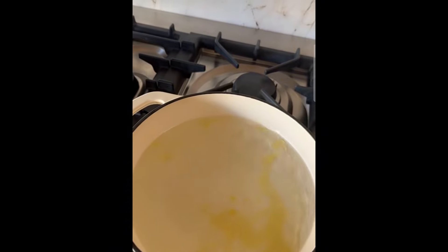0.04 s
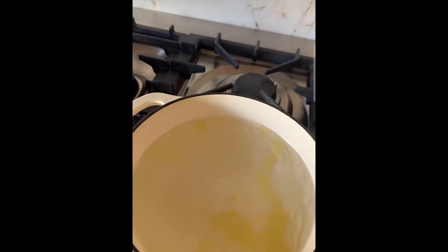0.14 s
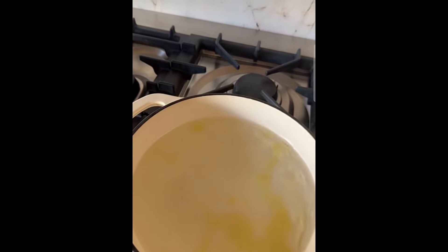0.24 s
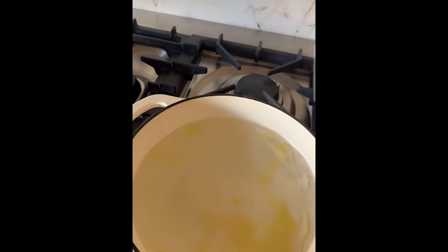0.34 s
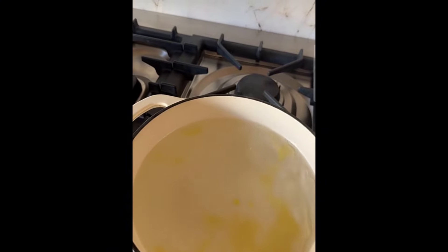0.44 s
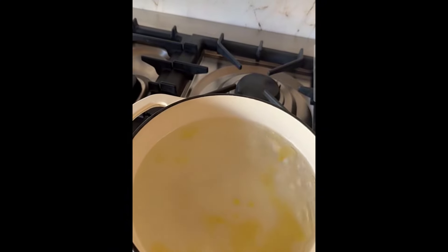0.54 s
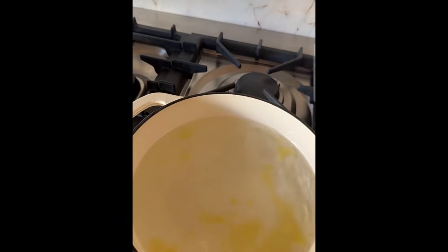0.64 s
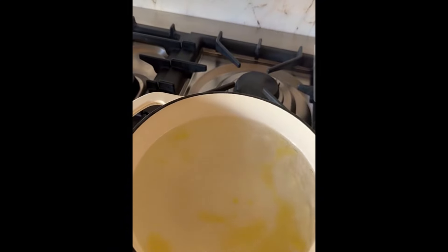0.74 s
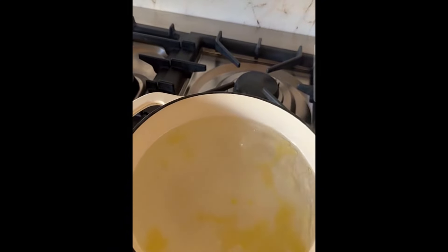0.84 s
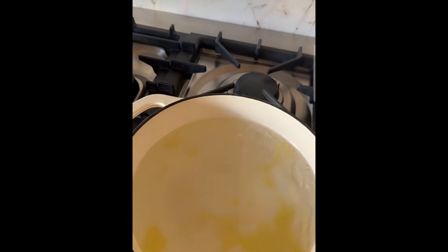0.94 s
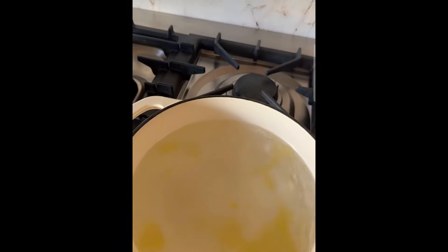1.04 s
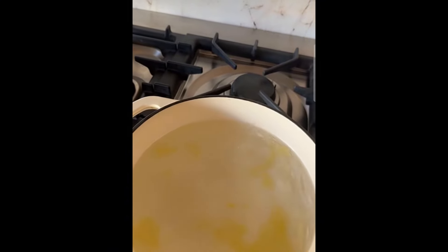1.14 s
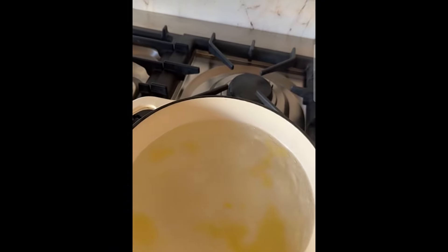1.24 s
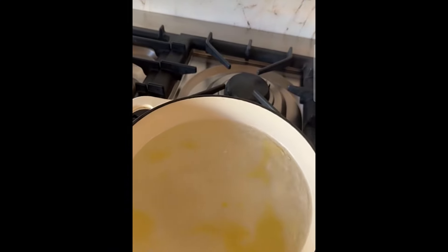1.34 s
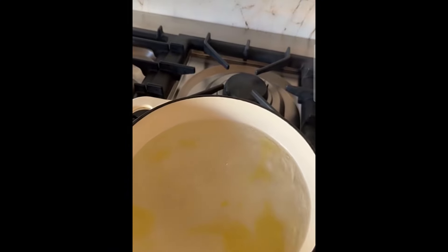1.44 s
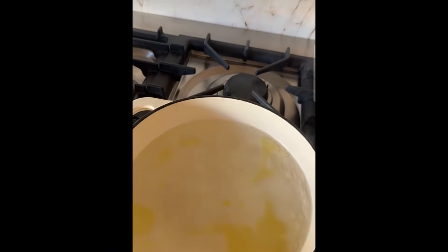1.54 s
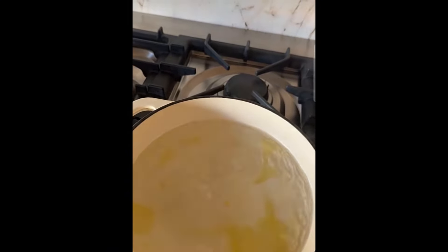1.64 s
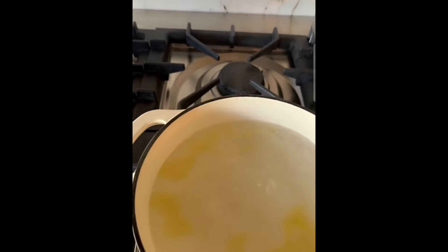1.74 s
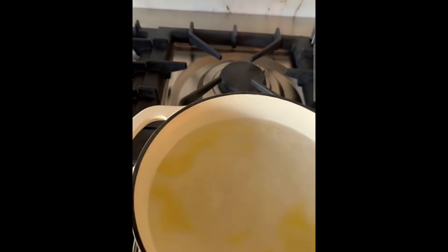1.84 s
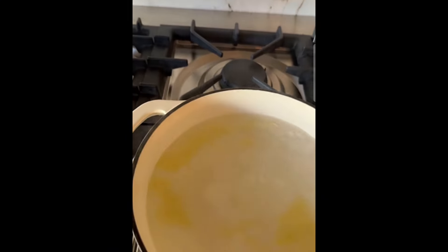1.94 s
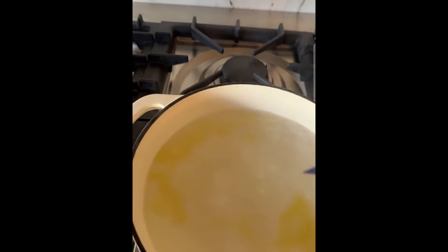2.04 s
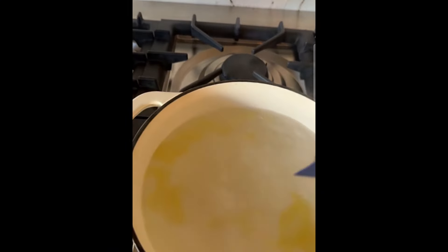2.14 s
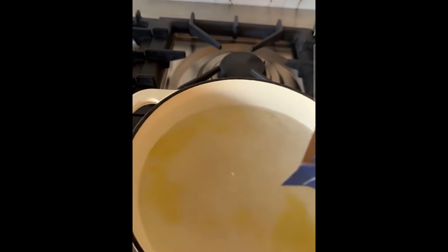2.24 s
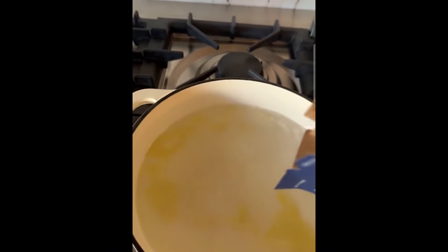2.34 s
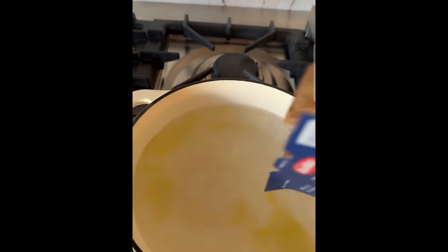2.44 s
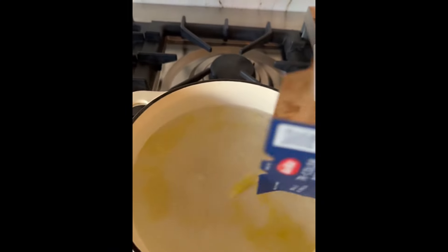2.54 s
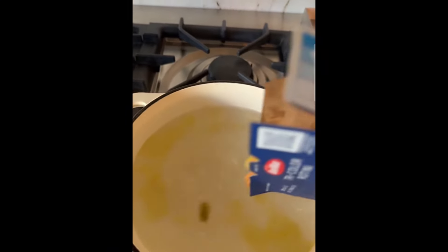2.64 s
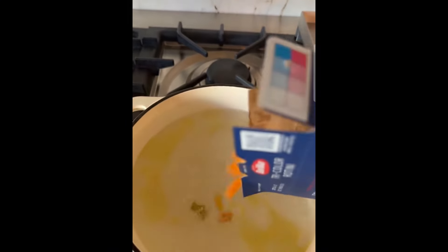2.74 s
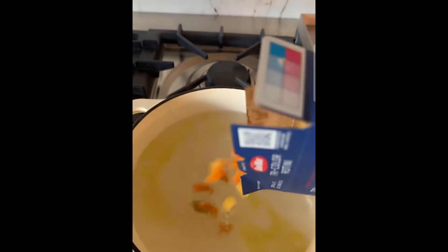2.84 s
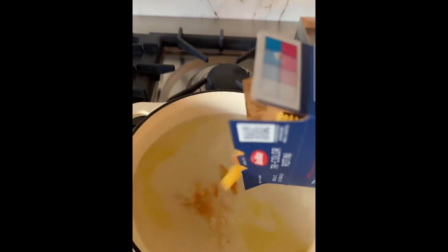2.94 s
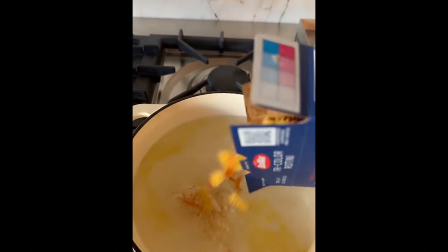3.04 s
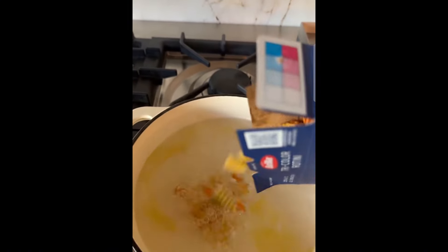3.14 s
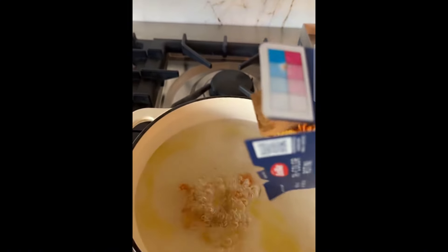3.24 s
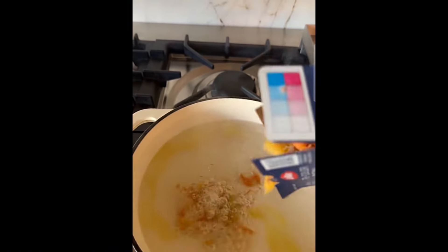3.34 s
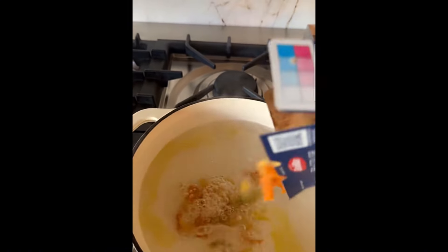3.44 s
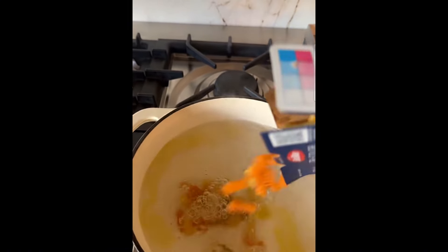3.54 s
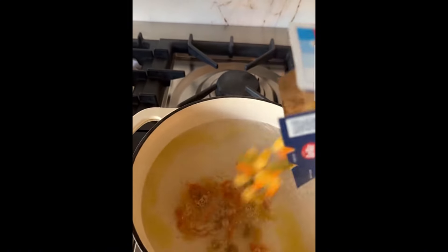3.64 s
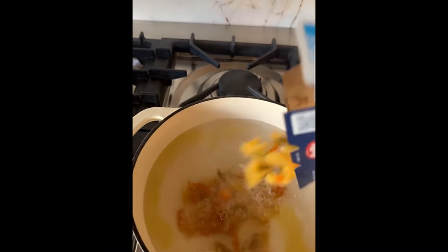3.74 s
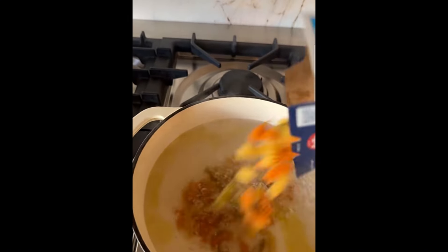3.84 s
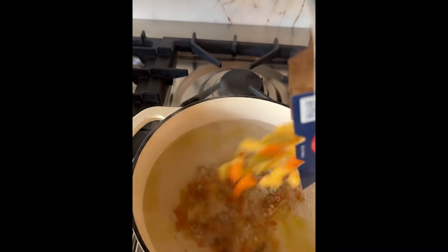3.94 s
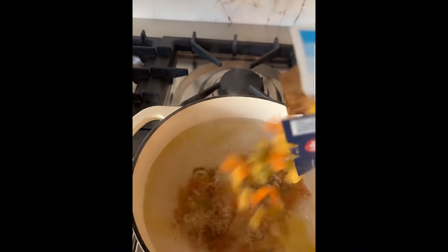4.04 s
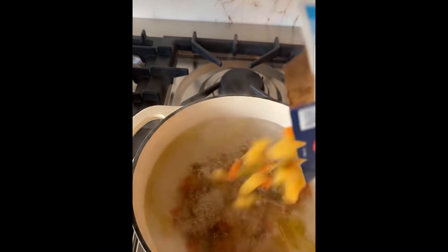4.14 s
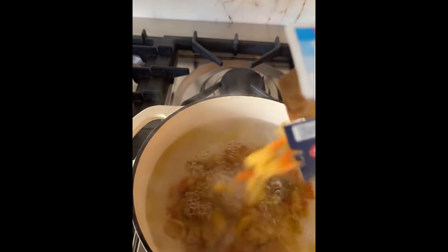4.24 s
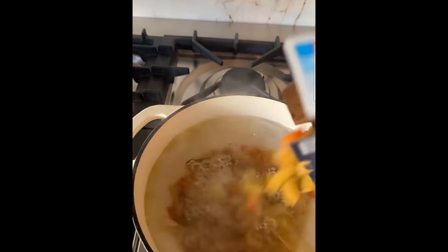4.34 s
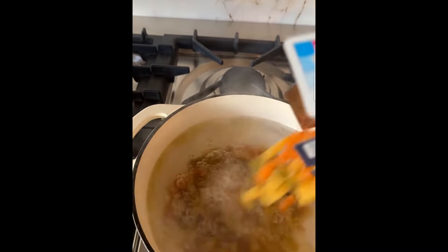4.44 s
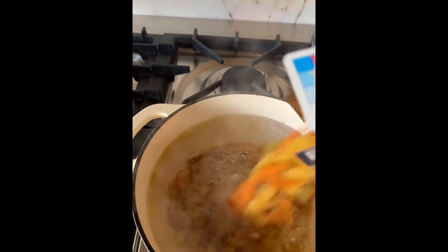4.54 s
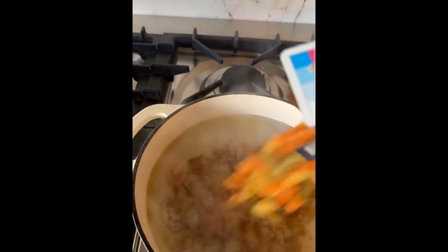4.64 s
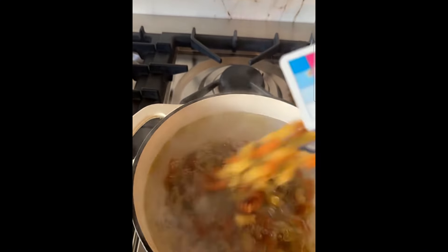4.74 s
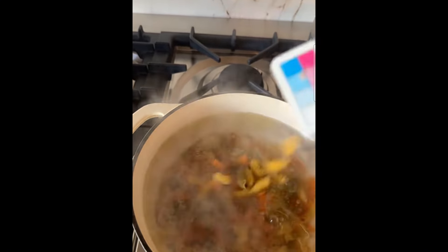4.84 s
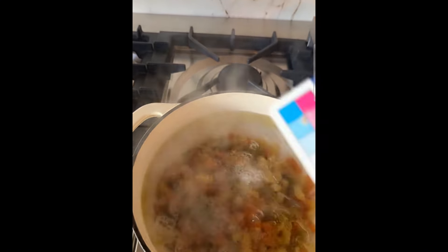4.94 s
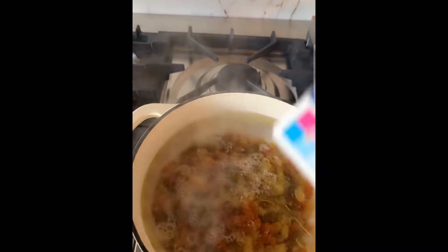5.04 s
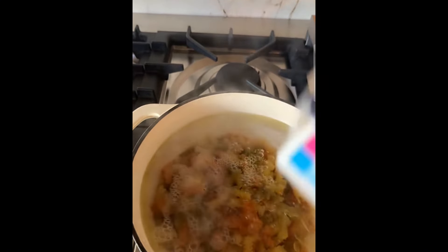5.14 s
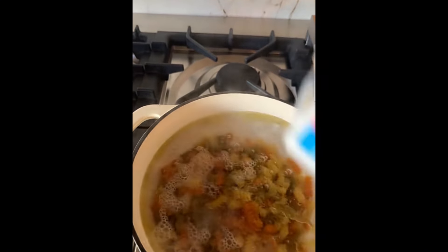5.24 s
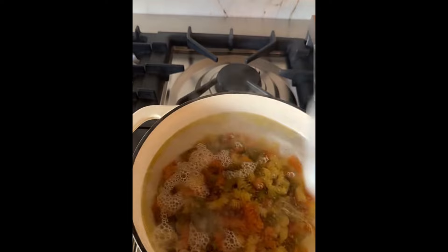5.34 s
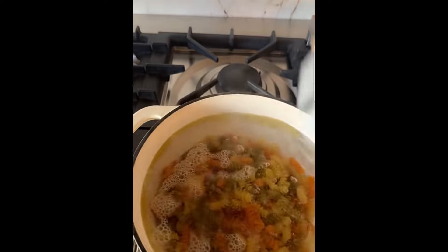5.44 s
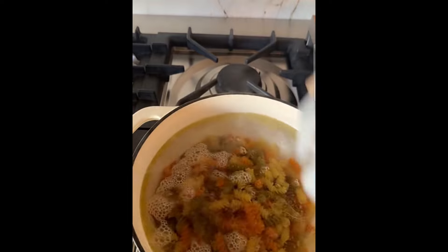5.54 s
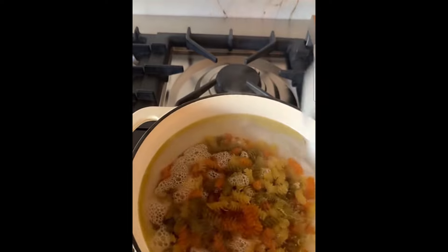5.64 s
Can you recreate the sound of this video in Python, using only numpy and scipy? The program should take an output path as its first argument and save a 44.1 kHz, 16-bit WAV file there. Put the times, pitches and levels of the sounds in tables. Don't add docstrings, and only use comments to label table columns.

```python
import sys
import numpy as np
from scipy import signal
from scipy.io import wavfile

SR = 44100
rng = np.random.default_rng(int(sys.argv[2]) if len(sys.argv) > 2 else 0)


def invert_db(x):
    u = np.asarray(x, float) / 20
    return 10 ** u


def digitize_waveform(pressure):
    field = np.atleast_2d(pressure).T
    bounded = np.clip(field, -1, 1)
    quanta = np.round(bounded * 32767).astype(np.int16)
    wavfile.write(sys.argv[1], SR, quanta)


N = 250929

# (time [s], flow [dB], openness [dB])
FIRST_FLOW = [
    (2.1, -44, -2),
    (2.33, -33.5, -0.5),
    (2.38, -32, -1),
    (2.53, -30.5, -1),
    (2.62, -25, -1.5),
    (2.93, -29, -1.5),
    (3.04, -33.5, 0),
    (3.14, -42, 0.5),
    (3.21, -35, -0.5),
]
SECOND_FLOW = [
    (3.29, -34, 0),
    (3.499, -23.5, -0.5),
    (3.74, -23, 1),
    (4.099, -24.5, 1.5),
    (4.449, -21.5, 3.5),
    (4.68, -24.5, 7),
    (4.801, -37.5, 13),
    (4.85, -47.5, 0),
    (4.93, -58.5, 8.5),
]


def in_time(rows):
    s, *columns = np.transpose(rows)
    return [np.interp(np.arange(N) / SR, s, column) for column in columns]


def at_hz(points, hz):
    points_hz, points_db = np.transpose(points)
    return np.interp(np.log(hz), np.log(points_hz), points_db)


def rms_one(x):
    return x / np.sqrt(np.mean(x ** 2) + 1e-20)


def drift(rate):
    r = np.exp(-80 * np.pi * rate / SR)
    noise = rng.standard_normal(N // 40 + 2002)
    slow = signal.lfilter([1], [1, -2 * r, r * r], noise)[2000:]
    return np.interp(np.arange(N) / 40, np.arange(len(slow)), rms_one(slow))


def resonance(x, hz, width_hz):
    r = np.exp(-np.pi * width_hz / SR)
    poles = [1, -2 * r * np.cos(2 * np.pi * hz / SR), r * r]
    return signal.lfilter([(1 - r * r) / 2, 0, (r * r - 1) / 2], poles, x + 1e-18)


def ring(clicks, hz, t60):
    r = invert_db(-60 / (t60 * SR))
    w = 2 * np.pi * hz / SR
    return signal.lfilter([0, np.sin(w)], [1, -2 * r * np.cos(w), r * r], clicks + 1e-18)


def band_pass(x, low_hz, high_hz):
    return signal.sosfilt(signal.butter(2, [low_hz, high_hz], "band", fs=SR, output="sos"), x)


def bands(length, count=3):
    edges = 25 * 2 ** np.arange(0, 9.5, 1 / count)
    white = rng.standard_normal((2, length))
    for k, (low, high) in enumerate(zip(edges, edges[1:])):
        yield np.sqrt(low * high), band_pass(white[k % 2], low, high)


def add(out, s, sound):
    i = round(s * SR)
    out[i:i + len(sound)] += sound[:N - i]


def blip(hz, cycles, length=900):
    turn = np.arange(length) / SR * hz
    return np.sin(2 * np.pi * turn) * np.e * turn / cycles * np.exp(-turn / cycles)


def puff(low_hz, high_hz, decay_s):
    t = np.arange(3000) / SR
    noise = band_pass(rng.standard_normal(len(t)), low_hz, min(high_hz, 16000))
    return 0.42 * rms_one(noise) * np.exp(-t / decay_s) * (1 - np.exp(-t / 0.00058))


def pour():
    # (time [s], surge [dB])
    shakes = [(2.585, 1), (2.699, 1), (2.852, 5), (3.379, -1), (3.55, 1.5), (3.7, -0.5), (3.853, 0.5),
              (4.017, 2.5), (4.19, 4.5), (4.351, 4.5), (4.498, 2.5), (4.689, 1)]
    surge_rise_s = 0.03
    flow_db, open_db = in_time(FIRST_FLOW + SECOND_FLOW)
    t = np.arange(N) / SR
    for s, db in shakes:
        since = np.clip((t - s) / surge_rise_s, 0, None)
        flow_db = flow_db + db * since * np.exp(1 - since)
    return flow_db, open_db


def stream():
    # (frequency [Hz], level [dB per Hz])
    full_colour = [(65, -31), (110, -17.5), (163, -9.5), (274, -7), (424, -7.5), (656, -11.5), (859, -3),
                   (1740, -12), (2480, -5.5), (3310, -16.5), (4250, -18.5), (5120, -33), (11300, -44),
                   (15700, -44)]
    # (frequency [Hz], level [dB per Hz])
    empty_colour = [(65, -8), (110, -16.5), (205, -20.5), (433, -14), (501, -12), (712, 3.5), (1040, -12.5),
                    (1170, -1.5), (1630, -12), (2420, 2.5), (3110, -5), (5560, -22), (11300, -29),
                    (15700, -26.5)]
    # (time [s], time [s])
    emptying_s = (3.02, 5.4)
    # (frequency [Hz], width [log pitch], full box [dB], empty box [dB])
    hollows = [(2450, 0.23, -1.5, -1.5), (4500, 0.12, 0, 9.5)]
    part_edges_hz = [50, 450, 1600, 5500, 15900]
    # (level over the flow [dB], share of the flow's swing [1], share of the openness [1])
    part_laws = [
        (-11, 0.83, -0.83),
        (-1.5, 1.03, -0.4),
        (-2.5, 1.023, 0.44),
        (-15.0, .9, 1.3),
    ]
    mean_flow_db, splash_patchy_db = -30, 1.23
    contacts_per_s, crowding = 2500, 0.8
    together = 0.76

    flow_db, open_db = pour()
    swing_db = flow_db - mean_flow_db
    part_db = [mean_flow_db + db + swing * swing_db + opens * open_db for db, swing, opens in part_laws]

    mean_per_s = np.clip(contacts_per_s * invert_db(crowding * (part_db[3] + 38)), 400, 20000)
    sizes = invert_db(3 * np.minimum(rng.exponential(1, N), 4.6)) * rng.choice([-1, 1], N)
    clumped = mean_per_s * invert_db(1.6 * drift(14.0))
    contacts = sizes * (rng.random(N) < clumped / SR) / np.sqrt(mean_per_s)

    fade = np.exp(-1 / (0.0043 * SR))
    spray = np.sqrt(signal.lfilter([1 - fade], [1, -fade], contacts ** 2))
    spray = spray * invert_db(splash_patchy_db * drift(16.0))

    share = rng.standard_normal(N)
    parts, power = np.zeros((4, N)), np.zeros((4, N))
    t = np.arange(N) / SR
    emptied = np.interp(t, emptying_s, [0, 1])
    for k, hz in enumerate(np.geomspace(60, 15500, num=55)):
        part = np.searchsorted(part_edges_hz, hz) - 1
        own_share = np.roll(share, 997 * k)
        if part == 3:
            width_hz, push = 0.15 * hz, spray * own_share
        else:
            width_hz, push = 0.11 * hz, contacts * (own_share + together * (-1) ** k)
        struck = resonance(resonance(push, hz, width_hz), hz, width_hz)
        lift = sum(np.exp(-(np.log(hz / top_hz) / wide) ** 2) * np.array(dbs) for top_hz, wide, *dbs in hollows)
        full_db = at_hz(full_colour, hz) + lift[0]
        empty_db = at_hz(empty_colour, hz) + lift[1]
        gain = invert_db((1 - emptied) * full_db + emptied * empty_db)
        parts[part] += gain * struck
        power[part] += gain ** 2 * np.mean(struck ** 2)

    end_s = SECOND_FLOW[-1][0]
    flowing = np.interp(t, [1.8, 1.9, end_s, end_s + 0.18], [0, 1, 1, 0])
    return flowing * sum(invert_db(db - 2.0) * part for db, part in zip(part_db, parts / np.sqrt(power)))


def clacks():
    # (time [s], peak [dB], pitch [Hz], box wall [dB])
    single_pieces = [(2.1036, -33, 2290, -20), (2.173, -30, 2500, -8), (2.2114, -19.5, 2340, -30),
                     (2.2608, -17, 2350, -10), (2.2937, -20, 2430, -16), (2.317, -12, 2450, -21),
                     (2.3461, -3, 2590, -15), (2.358, -9.5, 2470, -4), (2.3714, -16, 2340, -8),
                     (2.4032, -8.5, 2400, -24), (2.4166, -8.5, 2510, -9), (2.4537, -18, 2540, -10),
                     (2.4694, -16.5, 2860, -14), (2.5096, -9, 2450, -11), (2.566, -7, 2520, -11),
                     (2.589, -2.5, 2440, -27), (2.592, -2, 2400, -24), (2.6144, -15, 2380, -17),
                     (2.625, -3.5, 2660, -21), (2.6926, -9, 2440, -15), (2.712, -5, 2480, -19),
                     (2.7464, -10, 2450, -21), (2.7829, -15, 2500, -8), (2.848, -9, 2350, 0),
                     (2.9185, -15.5, 2540, 1), (2.9751, -33, 2600, 2), (3.0121, -18, 2290, 8),
                     (3.0313, -22.5, 2700, 8.5), (3.053, -21, 2450, -14), (3.2545, -31, 2870, -4),
                     (3.4324, -33, 2380, 2), (3.511, -14, 2450, -2), (3.5528, -6, 2384, -10),
                     (3.5894, -21, 2500, 9), (3.6656, -8, 2670, 2), (3.7104, -3.5, 2350, 3),
                     (3.8474, -6, 2200, -2.5), (3.894, -7.5, 2320, 1), (3.9414, -28, 2370, 16),
                     (3.9964, -7, 2440, -22), (4.0114, -7, 2850, 0), (4.0422, -8, 2380, 2),
                     (4.0873, -10.5, 2300, 0), (4.157, -6, 2390, -13), (4.2084, -7, 2560, -20),
                     (4.2223, -5, 2410, -11), (4.3055, -17, 2370, -22), (4.3534, -5, 2460, -21),
                     (4.3769, -2, 2400, -12), (4.4676, -22, 2330, -13), (4.506, -5.5, 2420, -11),
                     (4.6079, -7, 2360, 4), (4.6424, -17, 2580, 5), (4.6902, -3.5, 2540, -10),
                     (4.7295, -17, 2510, 1), (4.751, -13.5, 3550, -31), (4.7844, -13, 2380, -12),
                     (4.8074, -24, 2420, -22), (4.8279, -21, 2400, -21)]
    spray_level_db, spray_opens = -26, 0.92
    out, open_db = np.zeros(N), pour()[1]
    rows = single_pieces
    chance = rng.uniform([1.5, 650, -5], [1.95, 1150, 5], (len(rows), 3))
    for (s, db, hz, wall_db), (overtone, wall_hz, spray_db) in zip(rows, chance):
        ringing = blip(hz, cycles=4.05) + invert_db(-10.0) * blip(overtone * hz, cycles=2.2)
        splash_db = spray_level_db + spray_opens * open_db[round(s * SR)] + spray_db
        add(out, s, invert_db(db - 11.5) * ringing)
        add(out, s, invert_db(db + wall_db - 10.5) * blip(wall_hz, cycles=1.6))
        add(out, s + 0.003, invert_db(db - 14) * puff(0.85 * hz, 1.2 * hz, decay_s=0.007))
        add(out, s, invert_db(db - 16.0) * puff(2350, 3400, decay_s=0.011))
        add(out, s, invert_db(db + splash_db) * puff(3200, 8900, decay_s=0.0029))
    return out


def knocks():
    # (time [s], peak [dB], pitch [Hz])
    thumps = [(2.177, -26, 970), (2.241, -40, 910), (2.259, -27, 1110), (2.346, -23, 1000),
              (2.372, -16, 855), (2.495, -19, 920), (2.508, -17, 820), (2.537, -18, 970),
              (2.681, -14, 1080), (2.709, -12, 795), (2.783, -20, 880), (2.83, -16, 940), (2.857, -10, 990),
              (2.892, -16, 790), (2.916, -9, 1040), (2.985, -20, 980), (3.083, -27, 935), (3.108, -25, 770),
              (3.159, -31, 874), (3.213, -30, 1030), (3.385, -18, 1010), (3.456, -19, 1180),
              (3.482, -21, 1070), (3.694, -12.5, 1100), (3.713, -7.5, 837), (3.747, -12, 795),
              (3.77, -28, 977), (3.855, -7.5, 753), (3.942, -11.5, 894), (4.008, -14.5, 750),
              (4.031, -11, 790), (4.311, -21, 770), (4.33, -15, 711), (4.363, -11, 704), (4.523, -13, 756),
              (4.57, -20, 775), (4.631, -10.5, 806), (4.67, -23, 700), (4.701, -19, 690), (4.742, -22, 820),
              (4.782, -23, 930), (4.828, -45, 783)]
    # (time [s], peak [dB])
    snaps = [(2.1044, -41), (2.1283, -33), (2.173, -30), (2.2111, -38), (2.2361, -41), (2.3069, -25),
             (2.347, -14), (2.372, -19), (2.403, -20), (2.4416, -22), (2.471, -29), (2.5573, -19),
             (2.5668, -15), (2.574, -18), (2.5883, -13), (2.616, -17), (2.622, -14), (2.6731, -21),
             (2.712, -15), (2.747, -13), (2.7833, -14.5), (2.8397, -22), (2.866, -20), (2.888, -23),
             (2.9754, -32), (3.0108, -33), (3.0534, -19), (3.1031, -30), (3.1555, -33), (3.1709, -30),
             (3.1979, -25), (3.2059, -26), (3.2543, -35), (3.3361, -30), (3.4877, -33), (3.6015, -24),
             (4.055, -23), (4.1582, -24), (4.2804, -11), (4.3039, -11), (4.3253, -23), (4.3607, -18),
             (4.4136, -16), (4.6424, -9), (4.751, -8.5)]
    out = np.zeros(N)
    for s, db, hz in thumps:
        cardboard = invert_db(db - 7.0) * blip(hz, cycles=1.78)
        scuff = invert_db(db - 10.0) * puff(0.6 * hz, 1.46 * hz, decay_s=0.0071)[:900]
        add(out, s, cardboard + scuff)
    for s, db in snaps:
        edge = invert_db(db - 3.0) * puff(3500, 5100, decay_s=0.0036)
        air = invert_db(db - 18.0) * puff(5600, 11000, decay_s=0.002)
        add(out, s, edge + air)
    return out


def landings():
    # (time [s], peak [dB])
    splashes = [(3.3841, -26), (3.4844, -30), (3.5458, -29), (3.5722, -32), (3.5932, -32), (3.6206, -21),
                (3.682, -27), (3.7299, -26), (3.7867, -21), (3.8216, -23), (3.8715, -24), (3.8905, -18),
                (4.0087, -16), (4.0526, -26), (4.0716, -20), (4.1359, -20), (4.1639, -26), (4.1863, -23),
                (4.2716, -20), (4.3016, -19), (4.3599, -32), (4.3943, -19), (4.4218, -20), (4.4697, -17),
                (4.503, -12), (4.6114, -21), (4.729, -10), (4.7505, -26)]
    # (time [s], peak [dB], pitch [Hz])
    low_thuds = [(2.214, -33, 270), (2.311, -31, 274), (2.348, -25.5, 507), (2.428, -30, 280),
                 (2.461, -34, 353), (2.541, -24, 426), (2.688, -24, 344), (2.794, -28, 401), (2.831, -23, 424),
                 (3.31, -38, 345), (3.384, -30, 314), (3.435, -29, 308), (3.479, -36, 286), (3.538, -29, 415),
                 (3.635, -23.5, 284), (3.711, -20, 463), (3.819, -34, 310), (3.91, -21, 443), (3.975, -24, 410),
                 (4.046, -27, 434), (4.071, -27, 452), (4.112, -31, 436), (4.169, -29, 420), (4.332, -28, 498),
                 (4.419, -31, 434), (4.511, -28, 438), (4.542, -27, 483), (4.572, -18, 420), (4.628, -21, 356),
                 (4.667, -30, 420)]
    out = np.zeros(N)
    for s, db in splashes:
        add(out, s, invert_db(db - 5.5) * puff(4600, 14000, decay_s=0.0044))
    for s, db, hz in low_thuds:
        add(out, s, invert_db(db - 5.5) * blip(hz, cycles=1.57, length=2500))
    return out


def door():
    # (time [s], peak [dB], thud pitch [Hz], thud [dB], crack [dB])
    blows = [
        (0.398, 6, 865, -21.5, -26.5),
        (0.408, -15, 433, -17, -21.5),
        (0.432, -14, 606, -6, -36),
        (0.474, -2, 577, -23, -35.5),
        (0.4765, -11, 566, 1, -49.5),
        (0.484, -29, 412, 18.5, -43),
        (0.519, -9, 650, -21, -54),
        (0.55, -28, 635, 3, -24),
        (0.615, -17, 720, -10, -37),
        (0.649, -33, 586, 2, -34),
    ]
    # (frequency [Hz], level [dB], t60 [s])
    panel = [(353, -6, .1), (460, -3.5, 0.085), (619, -6, 0.25), (678, -20, 0.28), (814, -2, 0.12),
             (1153, -15.5, .15), (1366, -8, 0.28), (1565, -22, .2), (1757, -10, 0.18), (1928, -6.5, .19),
             (1996, -20.5, 0.19), (2295, -17.5, .15), (2450, -22, 0.2)]
    # (frequency [Hz], level [dB], t60 [s])
    latch = [(3009, -6, 0.082), (3332, -13, 0.28), (3650, -11, 0.4), (3838, -7, 0.095), (4021, -3, 0.085),
             (4150, -5, .1), (4310, -4, 0.11), (4613, -19, 0.17), (5249, -9, 0.085), (5981, -8, 0.05),
             (8952, -14, 0.13)]
    # (frequency [Hz], level [dB], t60 [s])
    carcass = [(84, -19.5, 0.27), (91.5, -24, 0.44)]
    # (frequency [Hz], level [dB per Hz])
    rattle_colour = [(35, -38.5), (60, 5.5), (540, -3), (621, -1.5), (1010, -13), (1950, -15), (2090, -14),
                     (2520, -19.5), (2900, -25.5), (4120, -22), (16000, -54.5)]
    # (frequency [Hz], t60 [s])
    rattle_decay = [(100, 0.097), (500, 0.13), (2000, 0.24), (5000, 0.1), (12000, .12)]

    t = np.arange(SR // 2) / SR
    click, out = np.eye(1, len(t))[0], np.zeros(N)
    rattle = np.zeros(len(t))
    for hz, band in bands(len(t)):
        rattle += invert_db(at_hz(rattle_colour, hz) - 60 * t / at_hz(rattle_decay, hz)) * band
    rattle = rms_one(rattle)
    boom = sum(invert_db(db) * ring(click, hz, t60) for hz, db, t60 in carcass) * (1 - np.exp(-t / 0.028))

    for s, db, thud_hz, thud_db, crack_db in blows:
        tilt_db = 3.34 * (crack_db + 29.5)
        body = np.zeros(len(t))
        for hz, level_db, t60 in panel:
            bright_db = tilt_db * np.clip(np.log2(hz / 1300) / 2, 0, 1)
            body += invert_db(level_db + bright_db + rng.normal(0, 1.5)) * ring(click, hz, t60)
        for hz, level_db, t60 in latch:
            bright_db = tilt_db * np.clip(np.log2(hz / 1300) / 2, 0, 1)
            body += invert_db(level_db - 16.0 + bright_db) * ring(click, hz, min(t60, 0.042))
        contact_hz = np.clip(15000 * invert_db(crack_db + 32.5), 1500, 18000)
        body = signal.sosfilt(signal.butter(2, contact_hz, fs=SR, output="sos"), body)
        rattle_hz = np.clip(2500 * invert_db(crack_db + 27.5), 200, 15000)
        soft = np.exp(-2 * np.pi * rattle_hz / SR)
        loose = signal.lfilter([1 - soft], [1, -soft], rattle)
        add(out, s, invert_db(db) * (invert_db(-17.5) * body + boom + invert_db(-33.0) * loose))
        add(out, s, invert_db(db + thud_db) * blip(thud_hz, cycles=1.0, length=2000))
        add(out, s, invert_db(db + crack_db - 14.5) * puff(5000, 14000, decay_s=0.019))
        crack = puff(3000, 8300, decay_s=0.0017)[:900] + invert_db(14.0) * blip(2200, cycles=1.0)
        add(out, s, invert_db(db + crack_db) * crack)
    return out


def small_sounds():
    # (time [s], peak [dB], pitch [Hz], top [dB])
    spits = [(0.8335, -31, 6700, -11), (1.2692, -28, 7120, -8), (1.3194, -41, 6800, -13),
             (1.4098, -41, 6840, -20), (1.4394, -42, 6800, -16), (5.4894, -57, 7400, -6)]
    # (time [s], peak [dB], centre [Hz], width [octaves], decay [s])
    ticks = [(.039, -53, 11100, 0.37, .012), (.947, -39, 7000, 4.1, 0.0021), (1.15, -53, 13400, .4, .008),
             (1.219, -41, 7000, 2.2, .004), (1.222, -46, 14500, .4, 0.023), (1.415, -52, 13500, .5, 0.028),
             (3.07, -27, 8000, 1.95, 0.0021), (3.115, -30.5, 6500, 2.7, 0.0049),
             (3.171, -33, 11000, 1.2, 0.0036), (3.198, -31, 7000, 1.7, 0.0052),
             (3.207, -27, 6500, 0.82, .003), (3.218, -37, 7000, 0.7, 0.0015),
             (2.77, -33.5, 13900, 0.49, 0.034), (3.786, -21, 14000, 0.32, 0.0036),
             (4.302, -16, 8000, 1.3, .004), (4.61, -15, 13000, 0.44, 0.0068),
             (4.731, -19, 10000, 1.3, 0.0044), (5.042, -44.5, 4170, 1.1, 0.016),
             (5.07, -52, 14100, .5, 0.011), (5.233, -44, 5030, 0.36, 0.0043), (5.397, -56, 12500, .4, .012)]
    # (time [s], length [s], pitch [Hz], level [dB])
    squeaks = [(.12, .03, 1110, -50), (.736, .044, 3130, -51), (1.16, .16, 3350, -62),
               (1.15, .13, 2980, -66), (2.1, .3, 270, -50)]
    out = np.zeros(N)
    for s, db, hz, top_db in spits:
        whistle = blip(hz, cycles=7.1)
        fizz = puff(5500, 10000, decay_s=0.0024)[:900]
        add(out, s, invert_db(db - 11.0) * (whistle + fizz))
        add(out, s, invert_db(db + top_db) * puff(12000, 15800, decay_s=0.0042))
    for s, db, hz, octaves, decay_s in ticks:
        half = 2 ** (octaves / 2)
        add(out, s, invert_db(db) * puff(hz / half, hz * half, decay_s))
    waver = 0.0089 * drift(59.75)
    for s, length_s, hz, db in squeaks:
        t = np.arange(round(length_s * SR)) / SR
        cycles = hz * np.cumsum(1 + waver[round(s * SR):][:len(t)]) / SR
        add(out, s, invert_db(db) * np.sin(np.pi * t / length_s) ** 0.5 * np.sin(2 * np.pi * cycles))
    return out


def sighs():
    # (time [s], length [s], frequency [Hz], width [Hz], level [dB])
    swells = [(.11, 0.22, 2380, 900, -56.5), (1.139, 0.21, 3270, 500, -66)]
    out = np.zeros(N)
    for s, length_s, hz, width_hz, db in swells:
        t = np.arange(round(length_s * SR)) / SR
        noise = resonance(resonance(rng.standard_normal(len(t)), hz, width_hz), hz, width_hz)
        add(out, s, invert_db(db) * np.sin(np.pi * (t / length_s) ** 0.77) * rms_one(noise))
    return out


def stove():
    # (time [s], level [dB])
    simmer = [(0, 1.5), (.2, 2), (.75, 4.5), (1.0, -2), (1.25, 1.5), (1.62, 0), (4.9, 0.5), (5.2, -2.5),
              (5.69, -1)]
    # (frequency [Hz], level [dB per Hz])
    flame_colour = [(15, -65), (25, -46.5), (47, -9), (71, 1), (112, -11.5), (345, -9), (494, -13),
                    (525, -13), (1120, -16), (1240, -14.5), (1350, 13), (1890, 14.5), (3000, -20.5),
                    (3900, -54), (6600, -120)]
    # (frequency [Hz], level [dB per Hz])
    hiss_colour = [(1760, -32), (3000, -2.5), (3750, -2.5), (4050, -10.5), (4400, -2.5), (5380, -14),
                   (5850, -6), (6360, -13.5), (7150, -9), (8810, -7), (9580, -14), (11100, -22.5),
                   (15800, -8.5)]
    # (frequency [Hz], width [Hz], level [dB])
    jets = [(1580, 80, -59), (1561, 750, -51.5), (5794, 90, -73), (7200, 490, -73.5), (9700, 600, -77)]
    # (level [dB], share of the simmer's swing [1], loss from 2.0 s on [dB])
    layer_laws = [
        (-40.5, 0.33, 3),
        (-56, 0.92, -0.6),
        (-56, 0.52, -0.5),
    ]
    # (start [s], end [s])
    eased_s = (1.7, 2.0)

    parts, flicker = np.zeros((3, N)), drift(8.5)
    for hz, band in bands(N, count=5):
        colour = flame_colour if hz < 3000 else hiss_colour
        level_db = at_hz(colour, min(hz, 15600)) + 2.1 * flicker + 1.4 * drift(1.9)
        parts[np.searchsorted([1000, 3000], hz)] += invert_db(level_db) * band
    simmer_db, = in_time(simmer)
    eased = np.interp(np.arange(N) / SR, eased_s, [0, 1])
    levels = [db + swing * simmer_db - lost_db * eased for db, swing, lost_db in layer_laws]
    out = sum(invert_db(db - 8.0) * rms_one(part) for db, part in zip(levels, parts))
    for hz, width_hz, db in jets:
        whistle = resonance(resonance(rng.standard_normal(N), hz, width_hz), hz, width_hz)
        hiss_db = levels[1 + (hz > 3000)]
        out += invert_db(db + hiss_db - hiss_db.mean() + 1.4 * drift(4.1)) * rms_one(whistle)
    return out


def kitchen(x, t60):
    t = np.arange(SR // 2) / SR
    tail = np.zeros(len(t))
    for hz, band in bands(len(t)):
        band_t60 = t60 * (1000 / max(hz, 1000)) ** 0.18
        tail += invert_db(-60 * t / band_t60) * band
    tail = tail * (t > 0.004)
    return signal.fftconvolve(x, tail / np.sqrt(np.sum(tail ** 2)))[:N]


def scene():
    pot = stream() + clacks() + knocks() + landings() + small_sounds() + sighs()
    cupboard = door()
    pot_room = invert_db(-12) * kitchen(pot, t60=0.41)
    cupboard_room = invert_db(-11.5) * kitchen(cupboard, t60=0.55)
    return (pot + pot_room + cupboard + cupboard_room + stove())[None]


def roll_off(x):
    return signal.sosfilt(signal.butter(12, 16470, fs=SR, output="sos"), x)


def record(dry):
    # (start [s], end [s])
    muted_s = (1.6218, 2.098)
    t = np.arange(N) / SR
    on = (t < muted_s[0]) | (t > muted_s[1])
    rounded = on * np.tanh(dry / 0.83)
    top_cut = signal.ellip(12, 0.5, 70, 15930, fs=SR, output="sos")
    bass_cut = signal.butter(2, 40, "high", fs=SR, output="sos")
    return roll_off(signal.sosfilt(np.vstack([top_cut, bass_cut]), rounded))


dry = scene()
out = record(dry)
digitize_waveform(out)
```